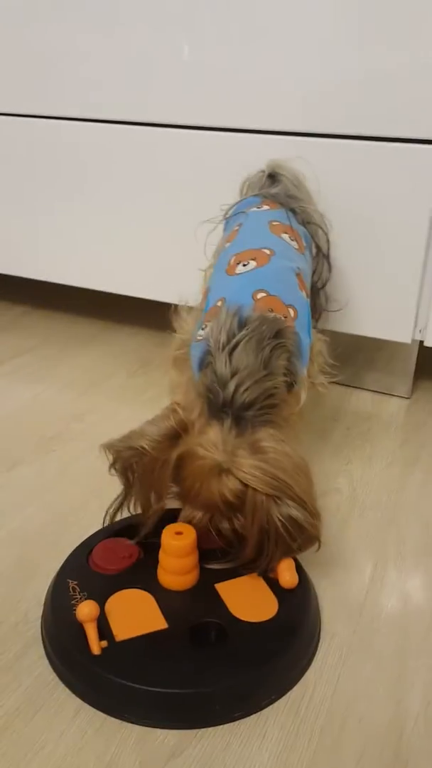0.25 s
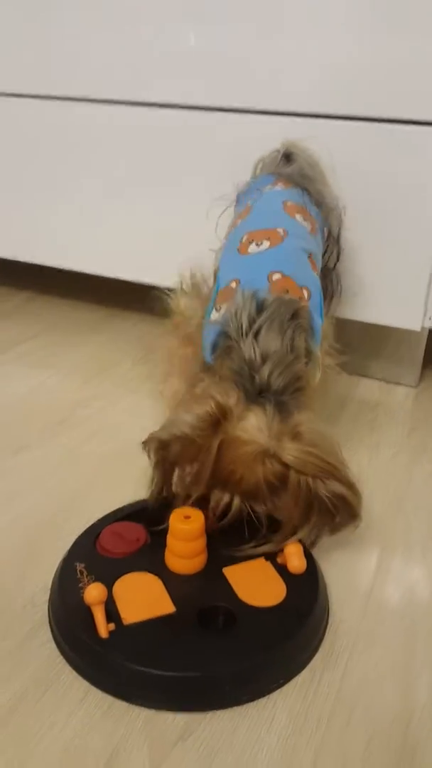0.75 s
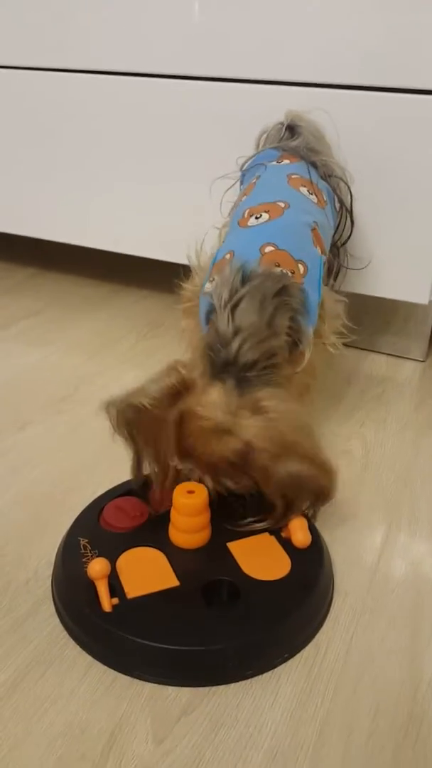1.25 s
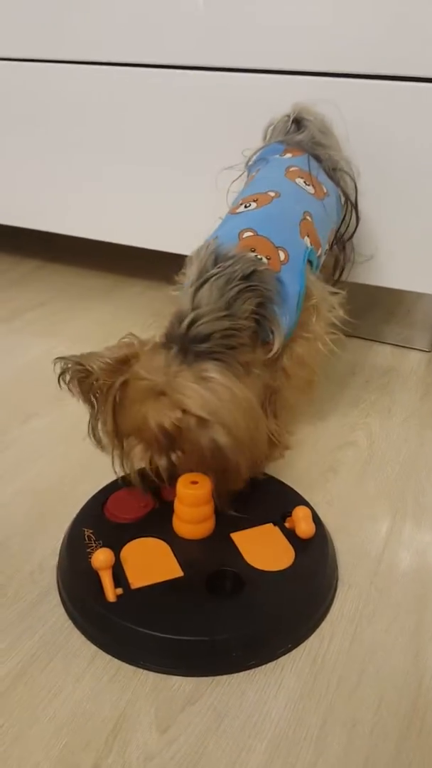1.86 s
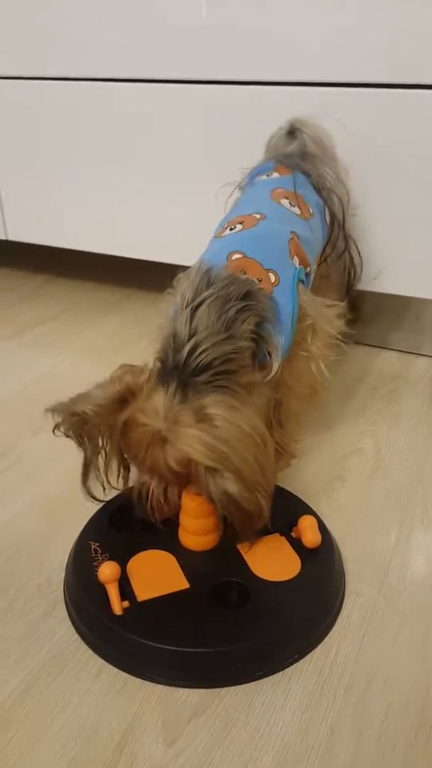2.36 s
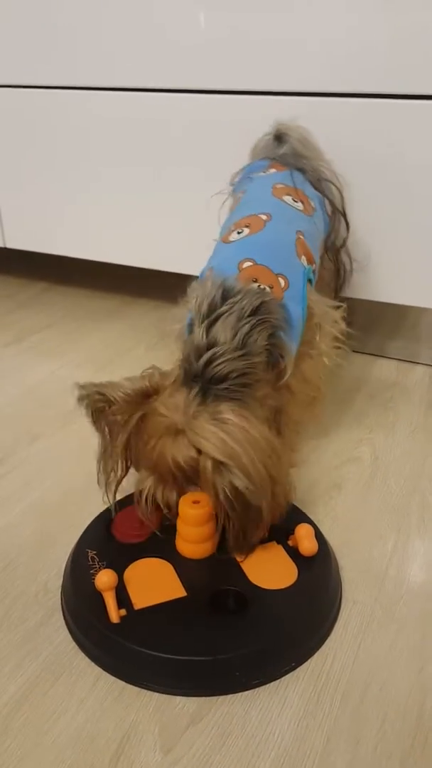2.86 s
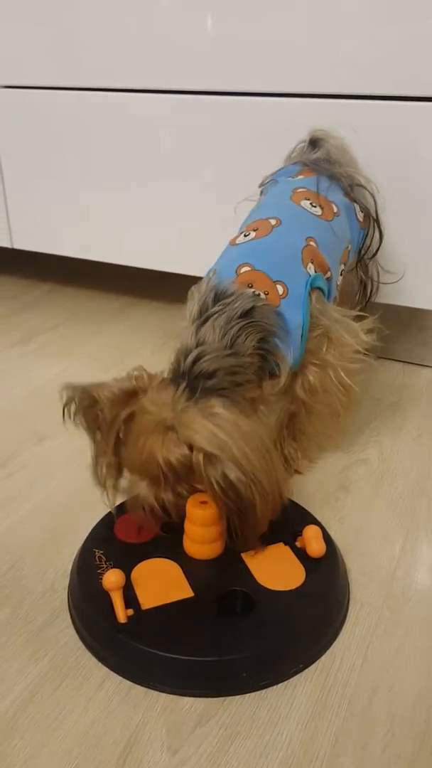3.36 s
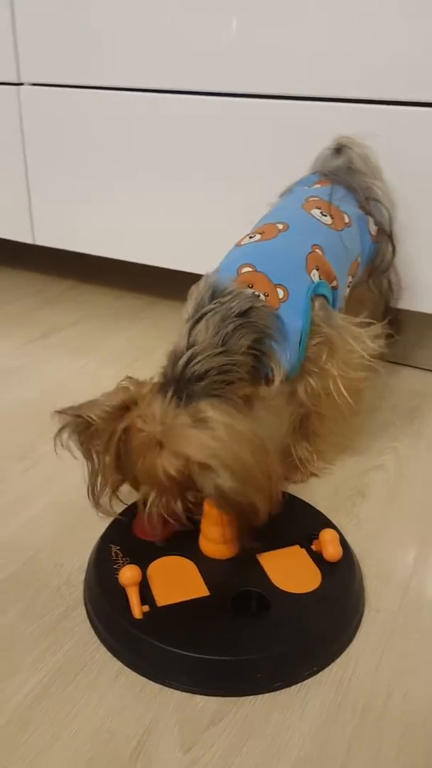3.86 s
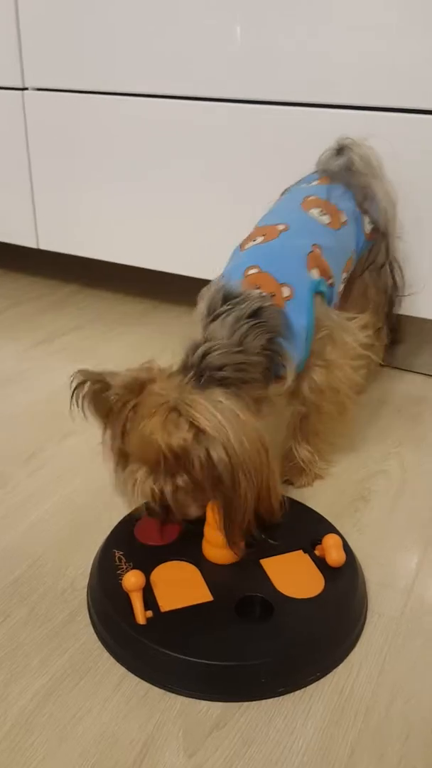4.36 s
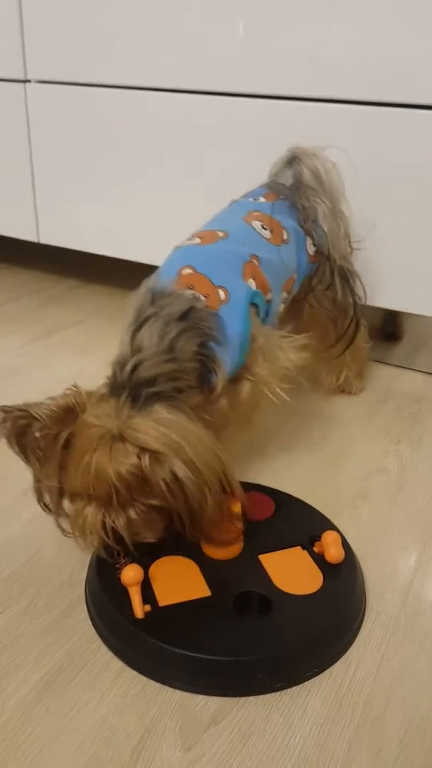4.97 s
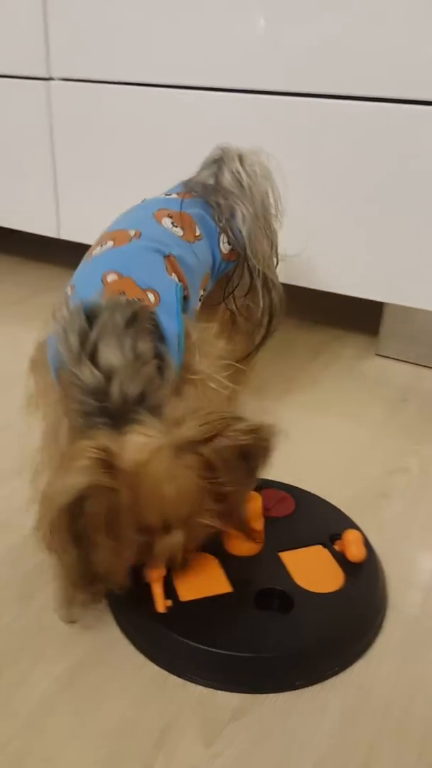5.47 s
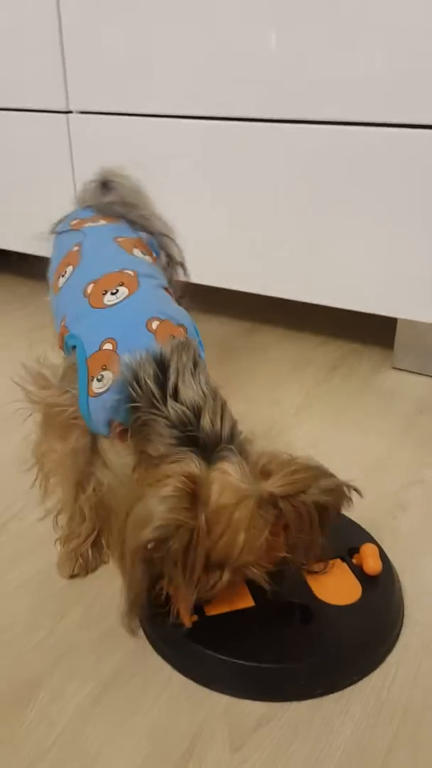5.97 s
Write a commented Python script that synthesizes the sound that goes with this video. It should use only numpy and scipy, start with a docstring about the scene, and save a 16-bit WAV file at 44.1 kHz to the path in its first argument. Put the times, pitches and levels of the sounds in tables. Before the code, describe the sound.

Hard plastic pieces click, clack and briefly scrape as a small dog noses a treat puzzle in a slightly echoing room.

```python
"""A hard plastic treat puzzle clacks as a small dog noses it: a sliding disc, a loose cone, a hinged flap.
Each knock is a snap plus chatter ringing the hollow plastic; disc and cone also rock the tray on the
laminate floor. Pieces scrape and squeak in their tracks, and the cone's thin wall tinkles.
The dog snuffles once before the flap, and its coat rustles. The bare room echoes over a low hum."""
import sys
import numpy as np
from scipy import signal
from scipy.fft import rfft, irfft, next_fast_len
from scipy.io import wavfile
from scipy.ndimage import uniform_filter1d

SR = 44100
rng = np.random.default_rng(int(sys.argv[2]) if len(sys.argv) > 2 else 0)


def transcribe(u):
    """Save the signal u as a 16-bit wav file named by the first command-line argument.

    u: samples, shape (n,) or (channels, n), limited to [-1, 1]; the rate is SR.
    q: integer samples, one column per channel.
    """
    v = np.clip(np.atleast_2d(u).T, -1, 1)
    q = np.round(v * 32767).astype(np.int16)
    wavfile.write(sys.argv[1], SR, q)


N = 273859
TIME_S = np.arange(N) / SR

# Knocks. Each row: start in seconds, level in dB, bass in dB, hardness (treble over middle) in dB.
DISC_HITS = [(0.134, -48.5, 20, 4.5), (0.1808, -50, 19, -1), (0.2085, -41, -7.5, 4.5),
             (0.2237, -35.5, 2.5, 8), (0.239, -38.5, -1, 10.5), (0.5989, -51, 4.5, -12.5),
             (0.6334, -61.5, 0, 13), (0.6664, -56.5, 19, 6), (0.6957, -31.5, 9.5, -7.5),
             (0.7288, -24.5, -0.5, -11), (0.7322, -27.5, -11, -11.5), (0.7475, -17, -12.5, 2.5),
             (0.95, -38.5, 1.5, -8), (1.127, -49.5, 5, -12.5), (1.6182, -33.5, -3, -5.5),
             (1.7997, -36.5, 3, -14), (1.8083, -44.5, -6, -13.5), (1.8464, -43.5, -14, -17),
             (1.8572, -49, 0, -13)]
CONE_HITS = [(2.258, -50.5, -6, -4), (2.274, -41, 0, -8), (2.2809, -33.5, -16, -17),
             (2.2963, -17.5, -6, -10.5), (2.3029, -23, -6.5, -5.5), (2.3337, -19, -5.5, -6),
             (2.3409, -18, -3, 0.5), (2.3464, -22.5, -2, -8.5), (2.3776, -23, -3, -7),
             (2.543, -38.5, 1.5, -9), (2.839, -34.5, -22.5, -18.5), (2.848, -42.5, 9, -5),
             (3.001, -47.5, 3.5, -23.5), (3.188, -57.5, 10, -15.5), (3.4379, -35.5, -9, -5),
             (3.4784, -42, -2.5, -10.5), (3.763, -48.5, -1, -12), (3.947, -58.5, 0.5, -23),
             (4.0373, -38.5, -2, -11), (4.0462, -39, -2.5, -3), (4.0568, -35, -6, -6),
             (4.2769, -52.5, 13, -8)]
FLAP_HITS = [(5.4005, -37.5, -1, -15.5), (5.4075, -39, -18, -9.5), (5.4437, -39, 3, -10),
             (5.4482, -36.5, -19, -9), (5.46, -44.5, 5, -4), (5.5245, -41, 12, -8), (5.5591, -34.5, 6, 0),
             (5.8195, -46.5, -1, -9), (5.949, -38.5, 5.5, -11), (5.9665, -52.5, 17, 1.5),
             (6.1339, -53, 8, -14), (6.1672, -42.5, 2, -4)]
# Each row: start in seconds, length in seconds, level in dB, hardness in dB.
SLIDE_STROKES = [(0.134, 0.036, -64.5, 11), (0.187, 0.027, -50.5, 1), (0.689, 0.065, -53.5, 1),
                 (1.607, 0.016, -56.5, -15.5), (2.776, 0.026, -64.5, -10.5), (2.806, 0.082, -51.5, -12),
                 (2.989, 0.021, -66, -23), (3.172, 0.022, -63.5, -4.5), (3.4, 0.06, -54, -12),
                 (3.719, 0.054, -55.5, -9), (3.999, 0.037, -52.5, -5), (5.519, 0.044, -50, -17),
                 (5.812, 0.03, -50.5, -18), (5.937, 0.014, -56.5, -18)]
# Each row: start in seconds, length in seconds, level in dB.
SQUEAK_EVENTS = [(0.726, 0.012, -28), (.942, 0.011, -34), (1.097, .03, -54.5), (1.846, 0.01, -47.5),
                 (2.822, 0.033, -42.5), (2.901, 0.019, -54.5)]
COAT_SWELLS = [(1.197, 0.2, -69), (5.124, 0.21, -68.5)]
# Plastic resonances. Each row: centre in Hz, width in Hz, strength in dB.
DISC_RESONANCES = [(607, 200, -4), (1040, 80, -4), (1640, 56, -6.5), (1750, 80, -7), (2161, 240, -10),
                   (2990, 120, -6), (4680, 530, -1.5), (6400, 240, -3)]
CONE_RESONANCES = [(455.5, 56, -7.5), (573, 180, 3.5), (713, 37.6, -0.5), (937, 40, -1), (1056, 130, 2),
                   (1277, 53, 0.5), (2120, 100, -3.5), (2720, 53, -11), (3700, 27, -5), (4260, 88, 3),
                   (4860, 70, 7.5), (6950, 45, 3.5), (7100, 310, -0.5)]
FLAP_RESONANCES = [(516, 22, 8.5), (586, 72, 8.5), (1107, 80, 1), (1800, 88, 6.5), (1980, 68, 5),
                   (2114, 51, 0.5), (3180, 160, 3), (3900, 70, -14.5), (4290, 100, 5), (4900, 54, 7.5),
                   (6880, 420, -3)]
TRACK_RESONANCES = [(634, 70, 2.5), (1020, 65, -0.5), (1770, 130, 3), (2950, 120, -5.5), (4620, 97, 13),
                    (7270, 250, 8)]
# Each row: frequency in Hz, T60 in seconds, relative level in dB.
CONE_WALL_MODES = [(4770, 0.15, -10), (4960, 0.14, -8.5), (7260, 0.035, 3.5), (7290, 0.03, 3)]
# Bass, middle, treble and top of a contact.
CONTACT_BANDS_HZ = [550, 1600, 3700, 9500]
# Spectral shapes. Each row: frequency in Hz, gain in dB.
PLASTIC_RADIATION_DB = [(40, -37), (110, -19), (220, -11.5), (350, -6), (520, 0), (800, 0), (1100, 1),
                        (1600, 1.5), (2700, 5.5), (4500, -3.5), (5900, -4), (7300, 1.5), (9500, -1.5),
                        (16000, -1.5)]
SNUFFLE_SHAPE_DB = [(120, -42), (200, -7.5), (345, -11.5), (378, -10.5), (471, -7), (607, -2), (769, -10),
                    (974, -6.5), (1480, -8.5), (2750, -0.5), (4750, -14), (6350, -14), (15500, -27.5)]
COAT_SHAPE_DB = [(300, -11), (1500, -7.5), (2700, 1), (4500, -13.5), (12000, -28.5)]
ECHO_SHAPE_DB = [(100, -1.2), (400, -3), (1000, 1), (2500, -1), (6000, 1.5), (14000, -0.43)]
AIR_SHAPE_DB = [(12, -38), (20, -11.5), (53, -6.5), (123, -9.5), (149, -4), (176, -6.5), (233, -8.5),
                (268, -12.5), (345, -14), (443, -18), (510, -14), (554, -18.5), (2800, -26.5),
                (7230, -39.5), (15800, -37.5)]
# Each row: frequency in Hz, T60 in seconds.
ECHO_T60_S = [(100, 0.55), (260, 0.52), (700, 0.43), (1840, 0.51), (4850, 0.56), (12800, 0.19)]
# Each row: frequency in Hz, left-right correlation.
ECHO_CORRELATION = [(100, 0.97), (300, 0.97), (600, 1), (1100, 0.43), (2000, -0.15), (4000, -0.25),
                    (14000, -0.13)]
AIR_CORRELATION = [(50, .94), (150, .9), (350, .6), (800, .3), (1500, .1), (14000, 0)]
# Each row: frequency in Hz, rms level in dB.
HUM_TONES = [(48.4, -81), (117, -83.5), (150.7, -76.5)]

# Top band. Each: gain in dB, dB per dB of hardness, dB per dB of level over REF_LEVEL_DB.
DISC_TOP, CONE_TOP = (-13.5, 1.25, -0.24), (-19.5, 0.8, 0.33)
FLAP_TOP, TRACK_TOP = (-13.5, 1.6, 0), (-12.5, 0.93, 0)
REF_LEVEL_DB, REF_HARDNESS_DB = -40, -10  # a middling knock


def knocks(hits, modes, top, chatter_s, chatter_db, correlation, snap_s, room_db, size=3000):
    """A snap and a dying buzz of re-contacts per hit; returns direct sound and echo."""
    direct, *echo_paths = np.zeros((3, 2, N))
    t = TIME_S[:size]
    for k, (start_s, level_db, bass_db, hardness_db) in enumerate(hits):
        # Stronger, harder hits settle sooner, with less chatter and more snap.
        halvings = (level_db - REF_LEVEL_DB) / 28 + (hardness_db - REF_HARDNESS_DB) / 16
        decay_s = chatter_s / 2 ** halvings
        buzz = np.exp(-t / decay_s) * (1 - np.exp(-t / (0.36 * decay_s)))
        force = from_db(chatter_db) * min(1, decay_s / .0018) ** 2 * noise_pair(correlation, size) * buzz
        force[:, 0] += np.exp(-decay_s / snap_s)
        clack = plastic(force, contact_colour(level_db, bass_db, hardness_db, top), modes)
        clack *= from_db(level_db) * np.sqrt(SR / 100)  # rms over 10 ms
        add(direct, start_s, clack)
        # Successive knocks alternate between two room echoes, so the tail sounds more diffuse.
        add(echo_paths[k % 2], start_s, clack * from_db(room_db))
    return direct, sum(room(path) for path in echo_paths)


def contact_colour(level_db, bass_db, hardness_db, top):
    """Bass, treble and top in dB; harder contacts reach higher."""
    top_db, per_hardness, per_level = top
    top_db += per_hardness * hardness_db + per_level * (level_db - REF_LEVEL_DB)
    return bass_db, hardness_db, top_db


def plastic(force, colour_db, modes, size=8192):
    """Shell response to a force: contact colour, radiation and modes; unit energy."""
    hz = np.fft.rfftfreq(size, 1 / SR)
    bass_db, treble_db, top_db = colour_db
    contact = [*zip(CONTACT_BANDS_HZ, [bass_db, 0, treble_db, top_db]), (SR / 2, top_db * 1.9)]
    shape_db = at_hz(PLASTIC_RADIATION_DB, hz) + at_hz(contact, hz)
    # Minimum phase: nothing sounds before the contact.
    cepstrum = irfft(np.log(from_db(shape_db)))
    cepstrum[1:size // 2] *= 2
    cepstrum[size // 2 + 1:] = 0
    ringing = 1 + sum(from_db(db) / (1 + 2j * (hz - mode_hz) / width_hz) for mode_hz, width_hz, db in modes)
    sound = irfft(rfft(force, size) * np.exp(rfft(cepstrum)) * ringing)
    return sound / np.sqrt(np.sum(sound ** 2) / 2)


def tray_rocking(hz=122, t60_s=0.4, gain_db=-24, bass_share=0.54):
    """Disc and cone hits, bassy ones most, set the tray booming on the floor."""
    t, power = TIME_S[:SR // 2], np.zeros(N)
    boom = fade(t, t60_s) * np.minimum(t * hz, 1)
    for start_s, level_db, bass_db, _ in [*DISC_HITS, *CONE_HITS]:
        add(power, start_s, (from_db(level_db + bass_share * bass_db + gain_db) * boom) ** 2)
    return np.sqrt(power) * wavering_tone(hz, N, waver=0.04, smooth_samples=800)


def cone_tinkles(chatter_s=0.008, knock_db=-61, slide_db=-69.5, spread_db=2.5, size=2048):
    """Fine chatter rings the cone's thin wall, in a new modal balance per touch."""
    out, t = np.zeros((2, N)), TIME_S[:size * 2]
    knocked = [(s, knock_db + 0.77 * (db - REF_LEVEL_DB)) for s, db, *_ in CONE_HITS]
    brushed = [(s, slide_db) for s, *_ in SLIDE_STROKES if CONE_HITS[0][0] < s < CONE_HITS[-1][0]]
    for start_s, level_db in knocked + brushed:
        chatter = noise_pair(0.37, size) * np.exp(-t[:size] / chatter_s)
        ring = 0
        for hz, t60_s, db in CONE_WALL_MODES:
            gain = from_db(db + spread_db * rng.standard_normal())
            ring += gain * np.sin(2 * np.pi * hz * t) * fade(t, t60_s)
        tinkle = signal.fftconvolve(chatter, ring[None], axes=1)
        rms_20ms = np.sqrt(np.sum(tinkle ** 2) / (SR / 50))
        add(out, start_s, from_db(level_db) * tinkle / rms_20ms)
    return out


def slides(slips_per_s=200, slip_db=18, bass_db=3.5, size=4096):
    """Pieces scrape in their tracks: friction noise plus uneven slips."""
    out = np.zeros((2, N))
    for start_s, length_s, level_db, hardness_db in SLIDE_STROKES:
        friction = noise_pair(0.6, size)
        slipping = rng.random(size) < slips_per_s / SR
        slips = slipping * rng.standard_normal(size) * from_db(slip_db)
        force = (friction + slips) * arch(TIME_S[:size], length_s) ** 0.29
        colour_db = contact_colour(level_db, bass_db, hardness_db, TRACK_TOP)
        scrape = plastic(force, colour_db, TRACK_RESONANCES) * np.sqrt(length_s * SR)
        add(out, start_s, from_db(level_db) * scrape)
    return out


def squeaks(hz=1758, rasp_db=-2.5, rasp_colour_db=(-16.5, -18, -41), size=2048):
    """Stick-slip locks on to one resonance and rasps against the track."""
    out = np.zeros((2, N))
    for start_s, length_s, level_db in SQUEAK_EVENTS:
        swell = arch(TIME_S[:size], length_s) ** 0.5
        tone = np.sqrt(2) * swell * wavering_tone(hz, size, waver=0.074, smooth_samples=90)
        friction = noise_pair(0.75, size) * swell
        rasp = plastic(friction, rasp_colour_db, DISC_RESONANCES) * np.sqrt(length_s * SR)
        add(out, start_s, from_db(level_db) * tone)
        add(out, start_s, from_db(level_db + rasp_db) * rasp)
    return out


def snuffle(start_s=4.275, level_db=-49, sag_db_per_s=59, attack_s=0.029, hold_s=0.11, release_s=0.028):
    """One short rush of air through the dog's nose."""
    t = TIME_S - start_s
    rise = np.clip(t / attack_s, 0, 1)
    stop = np.clip(1 - (t - attack_s - hold_s) / release_s, 0, 1)
    flow = rise * stop * from_db(level_db - sag_db_per_s * np.maximum(t - attack_s, 0))
    return flow * coloured_noise(SNUFFLE_SHAPE_DB, [(200, 0.54), (8000, 0.73)])


def coat_rustles():
    """Long fur brushes a cloth vest as the dog shifts."""
    motion = sum(from_db(db) * arch(TIME_S - start_s, length_s) for start_s, length_s, db in COAT_SWELLS)
    return motion * coloured_noise(COAT_SHAPE_DB, [(200, 0.8), (8000, 0.3)])


def room(x, build_s=0.0034, bands=16):
    """Reflections thicken, then die, the top first; new paths per call."""
    t, hz = TIME_S[:SR], np.fft.rfftfreq(SR, 1 / SR)
    noise = noise_spectra(ECHO_CORRELATION, SR)
    edges_hz = np.geomspace(70, 17000, bands + 1)
    response, build = 0, 1 - np.exp(-(t / build_s) ** 2)
    for low_hz, high_hz in zip(edges_hz, edges_hz[1:]):
        centre_hz = np.sqrt(low_hz * high_hz)
        band = irfft(noise * ((hz >= low_hz) & (hz < high_hz)))
        tail = fade(t, at_hz(ECHO_T60_S, centre_hz)) * build
        response += band * tail / np.sqrt(np.sum(tail ** 2)) * from_db(at_hz(ECHO_SHAPE_DB, centre_hz))
    return signal.fftconvolve(x, response, axes=1)[:, :N]


def background(air_db=-63.5):
    """Still air and a faint appliance hum."""
    hum = sum(from_db(db) * np.sin(2 * np.pi * (hz * TIME_S + rng.random())) for hz, db in HUM_TONES)
    return from_db(air_db) * coloured_noise(AIR_SHAPE_DB, AIR_CORRELATION) + np.sqrt(2) * hum


def mic_pair(x, left_lag_s=25e-6, shared_below_hz=600):
    """Two close microphones share the bass; the left lags."""
    size = next_fast_len(N + SR // 20, True)
    hz = np.fft.rfftfreq(size, 1 / SR)
    left, right = rfft(x, size)
    mid = (left + right) / 2
    side = (left - right) / 2 * hz / (hz - 1j * shared_below_hz)
    lag = np.exp(-2j * np.pi * hz * left_lag_s)
    return irfft(np.array([(mid + side) * lag, mid - side]), size)[:, :N]


def from_db(db):
    return 10 ** (np.asarray(db) / 20)


def unit_rms(x):
    return x / np.sqrt(np.mean(x ** 2) + 1e-20)


def at_hz(points, hz):
    """Interpolate over log frequency."""
    known_hz, values = np.transpose(points)
    return np.interp(np.log(np.maximum(hz, 1)), np.log(known_hz), values)


def add(track, start_s, sound):
    """Mix in place."""
    start = int(round(start_s * SR))
    part = sound[..., :N - start]
    track[..., start:start + part.shape[-1]] += part


def fade(t, t60_s):
    """Exponential decay."""
    return np.exp(-np.log(1000) * t / t60_s)


def arch(t, length_s):
    """Half-sine envelope."""
    return np.abs(np.sin(np.pi * np.clip(t / length_s, 0, 1)))


def wavering_tone(hz, size, waver, smooth_samples):
    """Sine with randomly wandering pitch."""
    wander = unit_rms(uniform_filter1d(rng.standard_normal(size), size=smooth_samples))
    return np.sin(2 * np.pi * np.cumsum(hz * (1 + waver * wander)) / SR)


def stereo(mid, side, correlation):
    """Left and right from two independent noises."""
    return np.sqrt((1 + correlation) / 2) * mid + np.sqrt((1 - correlation) / 2) * side * [[1], [-1]]


def noise_pair(correlation, size):
    """Stereo white noise."""
    return stereo(*rng.standard_normal((2, size)), correlation)


def noise_spectra(correlations, size):
    """Stereo white spectra, correlated per frequency."""
    correlation = np.clip(at_hz(correlations, np.fft.rfftfreq(size, 1 / SR)), -1, 1)
    return stereo(*rfft(rng.standard_normal((2, size))), correlation)


def coloured_noise(shape_db, correlations):
    """Steady shaped stereo noise; unit rms."""
    size = next_fast_len(N, True)
    gain = from_db(at_hz(shape_db, np.fft.rfftfreq(size, 1 / SR)))
    return unit_rms(irfft(noise_spectra(correlations, size) * gain, size)[:, :N])


def scene():
    """Toy and dog close by, slightly louder on the left, with echo and background."""
    rubbing = slides() + squeaks() + snuffle() + coat_rustles()
    tinkles = cone_tinkles()
    disc = knocks(DISC_HITS, DISC_RESONANCES, DISC_TOP,
                  chatter_s=0.0035, chatter_db=-12.5, correlation=0.86, snap_s=0.0012, room_db=-0.5)
    cone = knocks(CONE_HITS, CONE_RESONANCES, CONE_TOP,
                  chatter_s=0.0044, chatter_db=-10, correlation=0.78, snap_s=0.0024, room_db=-0.5)
    flap = knocks(FLAP_HITS, FLAP_RESONANCES, FLAP_TOP,
                  chatter_s=0.004, chatter_db=-13.5, correlation=0.64, snap_s=0.0017, room_db=-1.5)
    direct, echo = np.sum([disc, cone, flap], axis=0)
    direct += rubbing + tinkles
    echo += room(from_db(-5.5) * rubbing + from_db(-18.5) * tinkles)
    balance = from_db([[0.3], [-0.3]])
    return (mic_pair(direct) + echo + tray_rocking()) * balance + background()


def record(dry):
    """Soft limit near full scale, then a steep low-pass."""
    ceiling, cutoff_hz = 0.9, 15900
    limited = dry / (1 + (dry / ceiling) ** 6) ** (1 / 6)
    return signal.sosfilt(signal.ellip(10, .1, 80, cutoff_hz, fs=SR, output="sos"), limited)


dry = scene()
out = record(dry)
transcribe(out)
```